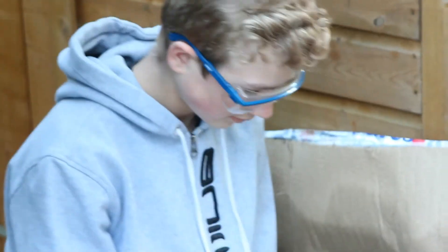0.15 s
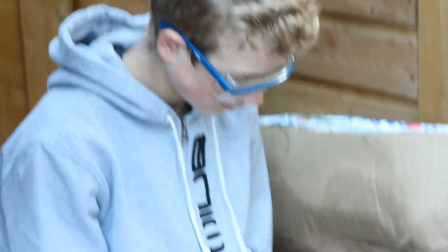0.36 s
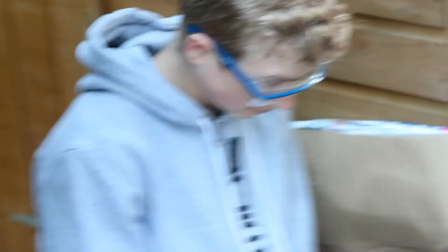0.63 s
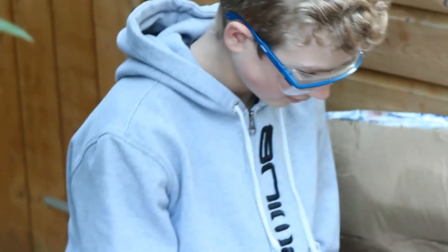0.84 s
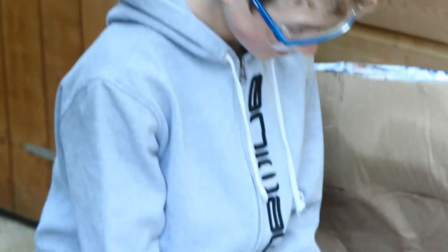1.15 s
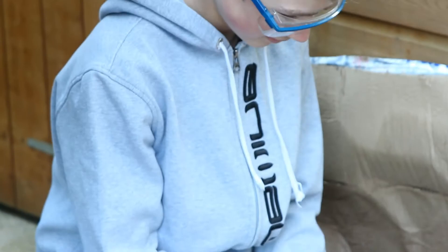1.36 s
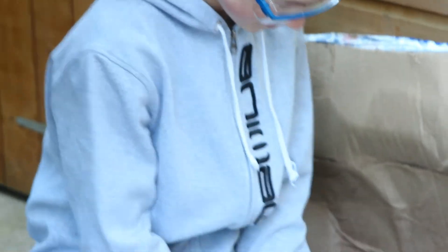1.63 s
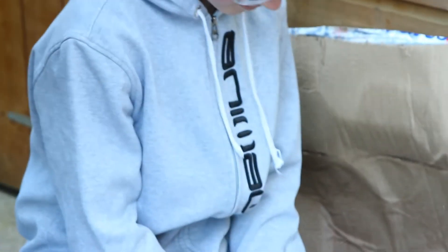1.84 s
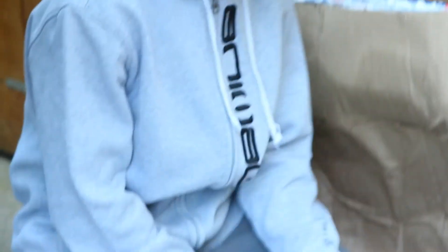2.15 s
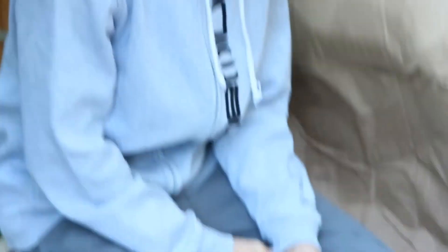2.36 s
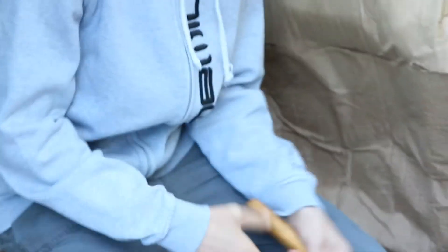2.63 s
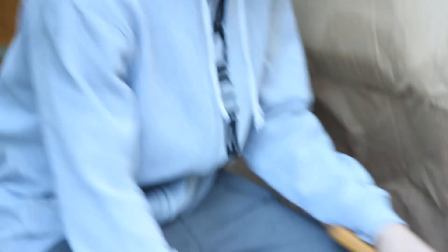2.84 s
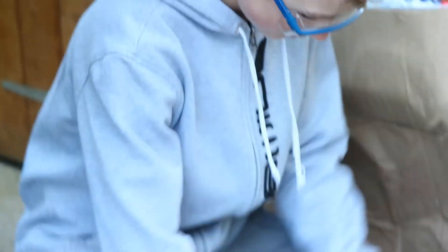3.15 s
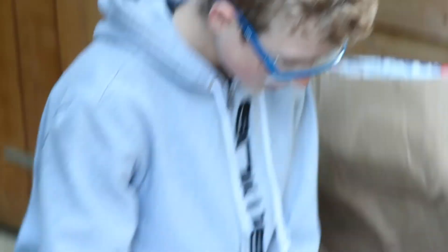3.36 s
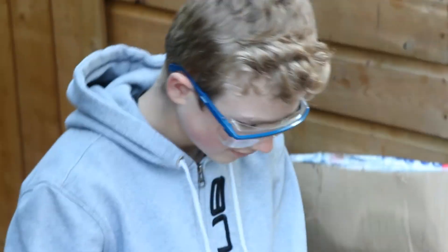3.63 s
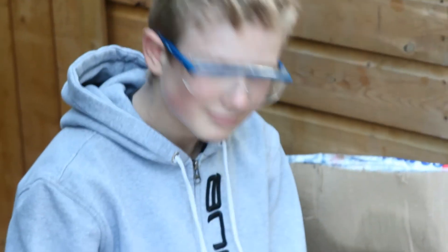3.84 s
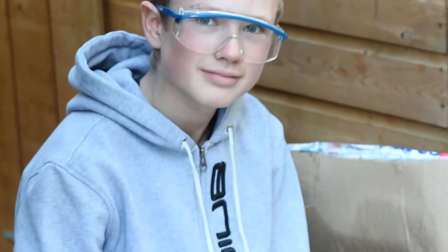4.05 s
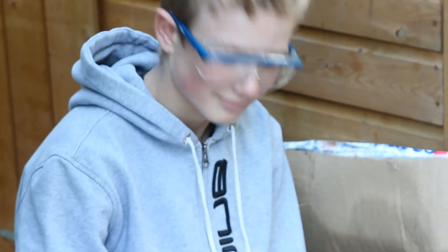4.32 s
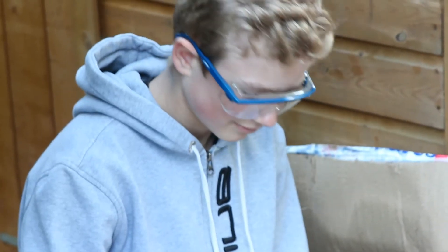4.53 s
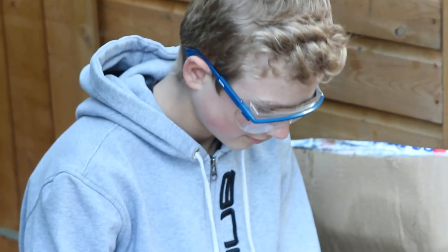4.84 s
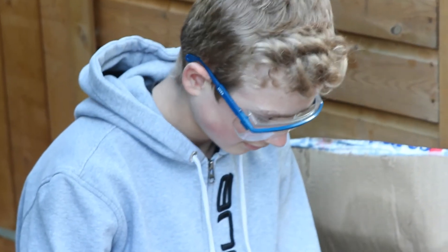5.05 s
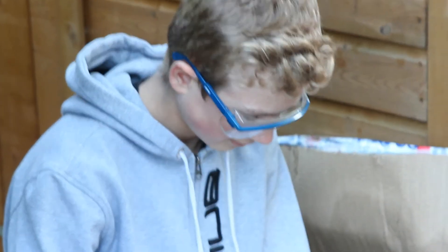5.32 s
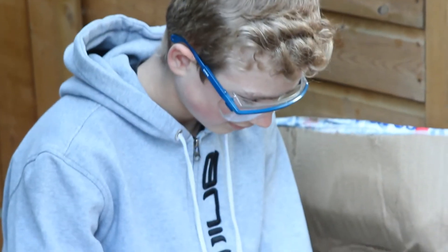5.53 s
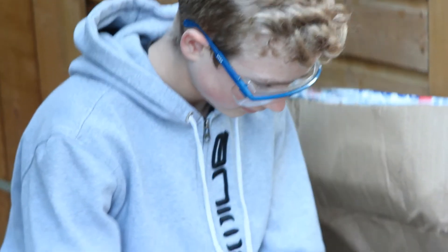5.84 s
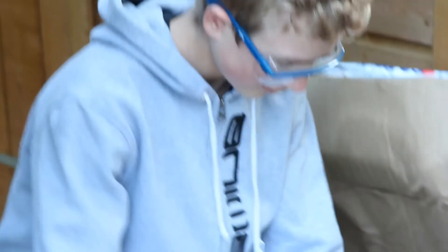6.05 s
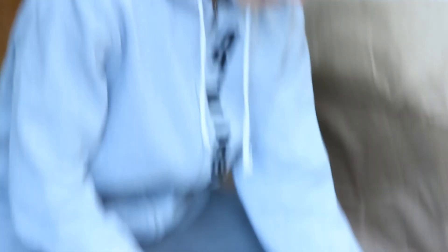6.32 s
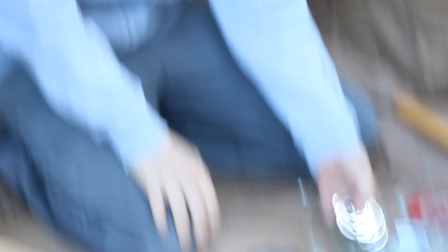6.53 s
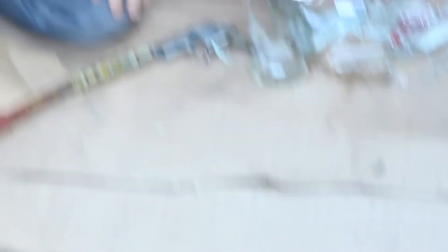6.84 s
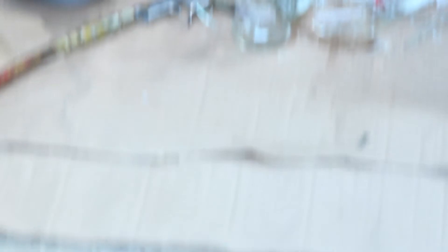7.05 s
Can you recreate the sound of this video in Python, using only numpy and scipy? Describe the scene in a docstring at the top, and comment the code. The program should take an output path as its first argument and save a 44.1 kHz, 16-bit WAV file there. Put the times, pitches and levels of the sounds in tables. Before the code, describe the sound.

Close in a small wooden shed, a piston compressor drones with a rough, nasal buzz. Four hard blows strike a glass jar about half a second apart; the first three ring, the fourth breaks it into tinkling bits. The hum ducks under each hit and swells back. Faint glass ticks follow, then a one-second bright air jet, then a few glass clicks over the returning hum.

```python
"""In a wooden shed a piston air compressor hums, its housing ringing at about 1 kHz on every stroke.
Sharp blows ring a glass jar; the last one breaks it and pieces tinkle. Later an air gun hisses for a second
and bits of glass click. Hum and glass are sums of tones and decaying noise; rush and jet are coloured noise.
The recorder's gain control ducks the hum under each blow and under the jet, then lets it swell back."""
import sys
import numpy as np
from scipy import signal
from scipy.fft import rfft, irfft, next_fast_len
from scipy.io import wavfile

SR = 44100
rng = np.random.default_rng(int(sys.argv[2]) if len(sys.argv) > 2 else 0)


def pcm_store(signal):
    """Save signal as 16-bit PCM."""
    levels = np.round(np.clip(np.atleast_2d(signal), -1, 1) * 32767)
    wavfile.write(sys.argv[1], SR, levels.astype(np.int16).T)


N = 316638
TIME = np.arange(N) / SR   # seconds
HALF_SECOND = TIME[:SR // 2]

TURNS_PER_S, FIRST_STROKE_S = 44.4804, .0061   # the crank makes one stroke a turn

# The blows on the jar. Each row: start in seconds, level of the crack in dB, level of the ring in dB,
# pitch in Hz around which the ring is strongest.
BLOWS = [(0.0, -1, 5, 3700), (0.5556, 1.5, 3.5, 3170), (1.0825, 3.5, 0.5, 5860), (1.6296, -0.5, -11, 7100)]


def from_db(db):
    """Turn decibels into a gain."""
    return 10 ** (np.asarray(db) / 20)


def rms_one(x):
    """Scale a sound to an rms of 1."""
    return x / np.sqrt(np.mean(x ** 2) + 1e-20)


def in_time(rows):
    """Make one curve over time per column, straight between the rows."""
    seconds, *columns = np.transpose(rows)
    return [np.interp(TIME, seconds, column) for column in columns]


def drift(rate):
    """Wander by chance: `rate` random values of spread 1 a second, joined by straight lines."""
    return np.interp(TIME * rate, np.arange(2048), rng.standard_normal(2048))


def noise(spectrum):
    """Make steady noise coloured by rows of pitch in Hz and level in dB per Hz."""
    hz, db = np.transpose(spectrum)
    size = next_fast_len(N)
    bins = np.maximum(np.fft.rfftfreq(size, 1 / SR), 1)
    gain = from_db(np.interp(np.log(bins), np.log(hz), db))
    coloured = irfft(rfft(rng.standard_normal(size)) * gain, size)
    return coloured[:N] * np.sqrt(SR / 2)


def fading(t60):
    """Half a second of exponential decay, falling 60 dB in t60 seconds."""
    return np.exp(-np.log(1000) * HALF_SECOND / t60)


def ring(hz, t60, shimmer=.45):
    """One struck mode: a fading sine that wavers by chance, as rings do in a reverberant room."""
    t = HALF_SECOND
    knots = np.linspace(0, t[-1], 70)
    in_step = np.interp(t, knots, rng.standard_normal(70))
    across = np.interp(t, knots, rng.standard_normal(70))
    angle = 2 * np.pi * hz * t
    wavering = (1 + shimmer * in_step) * np.sin(angle) + shimmer * across * np.cos(angle)
    return wavering * fading(t60)


def add(out, s, sound):
    """Mix a sound in at time s."""
    at = max(round(s * SR), 0)
    out[at:at + len(sound)] += sound[:N - at]


def intake(rush_db=-2.5, valve_db=0.5, valve_lag_s=0.0064):
    """Air rushes through intake and fan as noise, swelling a little between strokes as the valves pass it."""
    # Colour of the rush before its overall level is set. Each row: pitch in Hz, level in dB per Hz.
    rush = [(30, -78), (70, -73), (130, -72.5), (200, -67), (450, -57.5), (750, -57), (1000, -46),
            (1400, -58), (2200, -61.5), (3200, -68.5), (4500, -74.5), (7000, -81), (9000, -90),
            (15000, -91)]
    valve = np.cos(2 * np.pi * TURNS_PER_S * (TIME - FIRST_STROKE_S - valve_lag_s))
    return from_db(rush_db + valve_db * valve) * noise(rush)


def compressor(hum_db=-16, wander_db=3.0, rough=0.042):
    """Tones at multiples of the crank speed: a housing ring with each stroke, a lower chuff and an even buzz."""
    # Tones that stand out. Each row: multiple of the crank speed, level in dB within the hum.
    strong_tones = dict([(4, -19.9), (5, -28.8), (7, -19.5), (11, -21.3), (12, -21.6), (15, -20.0),
                         (16, -16.6), (17, -19.7), (20, -17.0), (21, -27), (22, -11.5), (23, -2.9),
                         (24, -11), (25, -22), (26, -19), (30, -24), (38, -26), (39, -24), (46, -20.5),
                         (48, -25.5), (56, -26.5)])
    # The weaker multiples make an even buzz. Each row: pitch in Hz, level per tone in dB within the hum.
    buzz = [(89, -40.5), (260, -50.5), (420, -30), (1200, -30.5), (1550, -38), (1950, -30), (2250, -46),
            (2450, -31.5), (2750, -37.5)]
    # The strokes limp in a round of four. Each entry: housing level of one stroke in dB.
    limp = [2.5, -0.5, 0.3, 2]
    # Slow rise and fall of the hum. Each row: time in seconds, housing ring in dB, other tones in dB.
    hum_level = [(0, 0.5, 5.5), (1.4, -.5, -0.5), (4.8, -1.5, 1), (5.5, 1, 5), (6.55, -1, -1),
                 (7.2, 0.5, -2.5)]
    housing_hz, housing_width_hz, top_order = 1023, 160, 62
    sweep = 0.78   # phase lag of the housing's side tones behind its centre tone, radians
    chuff_lag_s, chuff_loose = 0.00195, 1.2   # delay after the stroke; largest random phase shift, radians
    thump, thump_lag_s, thump_width_s = 0.18, 0.00086, 0.003

    turns = (TIME - FIRST_STROKE_S) * TURNS_PER_S
    housing, body = np.zeros(N), np.zeros(N)
    for order in range(2, top_order + 1):
        chance, wander = 2 * rng.random() - 1, drift(1.568)
        hz, angle = order * TURNS_PER_S, 2 * np.pi * order * turns
        db = strong_tones.get(order, np.interp(hz, *np.transpose(buzz)))
        off_centre_hz = abs(hz - housing_hz)
        if off_centre_hz < housing_width_hz:   # the ring sweeps slightly in pitch within each stroke
            lag = sweep * min(off_centre_hz / TURNS_PER_S, 1)
            housing += from_db(db) * np.cos(angle - lag)
        elif housing_hz / 2 < hz < housing_hz:   # the chuff is only loosely in step with the stroke
            lag = 2 * np.pi * hz * chuff_lag_s
            body += from_db(db) * np.cos(angle - lag + chuff_loose * chance)
        else:   # reflections scramble the rest, and short waves vary most from place to place
            wandering_db = db + wander_db * wander * min(hz / housing_hz, 1)
            body += from_db(wandering_db) * np.cos(angle + np.pi * chance)

    strokes = np.arange(int(N / SR * TURNS_PER_S) + 2)
    stroke_gain = from_db(np.interp(turns, strokes, np.resize(limp, len(strokes))))
    from_stroke_s = (turns - np.round(turns)) / TURNS_PER_S
    thumping = 1 + thump * np.exp(-((from_stroke_s - thump_lag_s) / thump_width_s) ** 2)
    housing *= stroke_gain * thumping * (1 + rough * drift(200))
    housing_db, body_db = in_time(hum_level)
    hum = from_db(housing_db) * housing + from_db(body_db) * body
    return np.sqrt(2) * from_db(hum_db) * hum


def air_flow_db(squeeze_s=4.78, ease_s=5.675, let_go_s=5.87):
    """The valve opens fast, the flow swells to full, sags as the finger eases and stops on release."""
    open_s, shut_db = .13, -42   # the valve opens from a faint leak
    swell_s, swell_db = 0.26, 5   # then the flow builds up to full
    ease_db_per_s, close_db_per_s = 54, 482   # the second adds to the first on release
    opening = np.clip((TIME - squeeze_s) / open_s, 0, 1)
    swelling = np.clip((TIME - squeeze_s - open_s) / swell_s, 0, 1)
    easing_db = ease_db_per_s * np.maximum(TIME - ease_s, 0)
    closing_db = close_db_per_s * np.maximum(TIME - let_go_s, 0)
    level_db = shut_db * (1 - opening) - swell_db * (1 - swelling) - easing_db - closing_db
    return level_db, TIME > squeeze_s


def air_gun(jet_db=-3.5, flutter_db=1.25, grain_db=0.5, seat_db=-28, seat_hz=4200, seat_width_hz=1200):
    """A bright, unsteady jet of noise; a narrow hiss near 4.2 kHz joins it and comes up as the flow builds."""
    # Colour of the jet, only its shape counts. Each row: pitch in Hz, relative level in dB per Hz.
    jet_colour = [(60, -43), (400, -9), (1200, -2), (2000, 0.5), (2800, 1), (4200, 4.5), (5600, 2),
                  (7300, 4.5), (8600, 1.5), (11000, 1), (13000, 2.5), (16000, 2.5)]
    seat_open_db = -22   # flow around which the narrow hiss of the valve seat comes up
    level_db, squeezed = air_flow_db()
    unsteady_db = flutter_db * drift(25) + grain_db * drift(250)
    jet = from_db(jet_db + level_db + unsteady_db) * rms_one(noise(jet_colour))
    edges_hz = [seat_hz - seat_width_hz / 2, seat_hz + seat_width_hz / 2]
    band = signal.butter(1, edges_hz, "band", fs=SR, output="sos")
    hiss = rms_one(signal.sosfilt(band, rng.standard_normal(N)))
    hiss_rise = np.tanh(from_db(level_db - seat_open_db))
    return squeezed * (jet + from_db(seat_db) * hiss_rise * hiss)


def knocks(t60=0.017, pair_ratio=1.11):
    """A damped piece of glass knocks with a close pair of modes that die at once."""
    # Each row: start in seconds, level in dB, pitch in Hz.
    knock_rows = [(2.25, -24, 2760), (6.1741, -11, 4150), (6.617, -13, 1400)]
    out = np.zeros(N)
    for s, db, hz in knock_rows:
        pair = ring(hz, t60) + .5 * ring(hz * pair_ratio, t60)
        add(out, s, from_db(db) * pair)
    return out


def shards(tick_t60=0.056, ring_t60=0.22, second_db=-5):
    """Larger shards tick with a burst of noise as they land or are nudged, and ring with two modes each."""
    # Each row: start in seconds, level of the tick in dB, level of the ring in dB,
    # pitch of the main mode in Hz, pitch of the second mode in Hz.
    shard_rows = [(1.649, -4, -8, 4400, 6950), (1.736, -18, -26, 4470, 10700),
                  (2.672, -27, -22, 4290, 13620), (2.693, -26, -33, 4300, 11750),
                  (2.7444, -23, -34, 11700, 12900), (2.8814, -33, -43, 13200, 10950),
                  (3.243, -42, -45, 12300, 14250), (3.3767, -31, -38, 7140, 10500),
                  (3.7165, -35, -49, 8100, 12300), (6.175, -16.5, -38, 8350, 6600),
                  (6.3822, -18, -39, 12300, 13300), (6.5804, -27, -41, 12500, 13500),
                  (6.616, -15, -32, 13420, 9900)]
    tick_colour = [(200, -9), (1500, 12.5), (4500, 3.5), (9000, -3), (16000, -9)]   # Hz, relative dB per Hz
    rings, ticks = np.zeros(N), np.zeros(N)
    for s, tick_db, ring_db, main_hz, second_hz in shard_rows:
        add(ticks, s, from_db(tick_db) * fading(tick_t60))
        pair = ring(main_hz, ring_t60) + from_db(second_db) * ring(second_hz, ring_t60)
        add(rings, s, from_db(ring_db) * pair)
    return rings + ticks * rms_one(noise(tick_colour))


def splinters(first_db, fall_db_per_s, lasting_s, t60, low_hz, count, spread_db=4, high_hz=15600):
    """The last blow throws pieces that land one by one, on the whole ever softer, each at its own pitch."""
    out = np.zeros(N)
    last_blow_s = BLOWS[-1][0]
    for k, (when, pitch, size) in enumerate(rng.random((count, 3))):
        after_s = lasting_s * ((k + when) / count) ** 1.4   # closest together at first
        db = first_db - fall_db_per_s * after_s + spread_db * (2 * size - 1)
        hz = low_hz + pitch * (high_hz - low_hz)
        add(out, last_blow_s + after_s, from_db(db) * ring(hz, t60))
    return out


def jar(db_per_octave=9.5, crack_t60=0.045, clatter_db=-13, clatter_t60=.18):
    """Each blow cracks, leaves a brief clatter and rings the modes that its point of contact favours."""
    # The jar's modes. Each row: pitch in Hz, level in dB before the blow's own, time to fall 60 dB in seconds.
    jar_modes = [(3155, -3, 0.2), (3240, -16, .07), (4790, -6.5, .14), (5840, -4.5, .18), (6040, -9, 0.18),
                 (6440, -3.5, 0.13), (7520, -2.5, 0.16), (8430, -9, .1), (9150, -9, 0.15), (10630, -5, .13),
                 (11200, -5, 0.15), (13100, -3, .1)]
    # Colour of a crack on glass, only its shape counts. Each row: pitch in Hz, relative level in dB per Hz.
    crack_colour = [(40, -27), (300, -4.5), (1300, 1), (2300, -6), (3200, -0.5), (4500, 2), (6500, -5),
                    (8500, -16.5), (13000, -15), (16000, -12)]
    rings, cracks = np.zeros(N), np.zeros(N)
    crack_shape = fading(crack_t60) + from_db(clatter_db) * fading(clatter_t60)
    for s, crack_db, ring_db, centre_hz in BLOWS:
        add(cracks, s, from_db(crack_db) * crack_shape)
        for hz, db, t60 in jar_modes:
            favour_db = -db_per_octave * abs(np.log2(hz / centre_hz))
            add(rings, s, from_db(ring_db + db + favour_db) * ring(hz, t60))
    return rings + cracks * rms_one(noise(crack_colour))


def shed(x, wet_db=-13, t60=0.33):
    """Wooden walls add a short, dense reverberation: a tail of fading noise that starts after 4 ms."""
    tail = rng.standard_normal(SR // 2) * fading(t60) * (HALF_SECOND > .004)
    tail /= np.sqrt(np.sum(tail ** 2))
    return x + from_db(wet_db) * signal.fftconvolve(x, tail)[:N]


def scene():
    """Compressor, glass and air gun at one microphone; the shed's echo is added to the glass."""
    grit = splinters(first_db=-18.5, fall_db_per_s=63, lasting_s=0.16, t60=.008, low_hz=3970, count=300)
    slivers = splinters(first_db=-23.5, fall_db_per_s=52, lasting_s=.36, t60=0.14, low_hz=6100, count=32)
    glass = jar() + shards() + knocks() + grit + slivers
    return (intake() + compressor() + air_gun() + shed(glass))[None]


def gain_control(x, threshold_db=-17, release_db_per_s=40, sense_s=0.0021, sense_hz=2500,
                 attack_s=.018, start_db=19):
    """Loud treble pulls the gain down quickly; it creeps back at a steady rate, from start_db of cut."""
    treble = signal.sosfilt(signal.butter(2, sense_hz, "high", fs=SR, output="sos"), x)
    keep = np.exp(-1 / (sense_s * SR))
    power = signal.lfilter([1 - keep], [1, -keep], treble ** 2)
    level_db = 10 * np.log10(power + 1e-12)
    over_db = np.maximum(level_db - threshold_db, 0)
    # hold the largest excess so far while it leaks away steadily
    fall_db = release_db_per_s * TIME
    held_db = np.maximum(np.maximum.accumulate(over_db + fall_db), start_db) - fall_db
    # smooth the steps so that the gain takes a moment to drop
    keep = np.exp(-1 / (attack_s * SR))
    cut_db, _ = signal.lfilter([1 - keep], [1, -keep], held_db, zi=[keep * start_db])
    return x * from_db(-cut_db)


def record(dry, cutoff_hz=15740):
    """Gain control, then clipping of peaks beyond full scale, then a steep top cut."""
    loud = np.clip(gain_control(dry[0]), -1, 1)
    top_cut = signal.ellip(12, .1, 70, cutoff_hz, fs=SR, output="sos")
    return signal.sosfilt(top_cut, loud)[None]


dry = scene()
out = record(dry)
pcm_store(out)
```